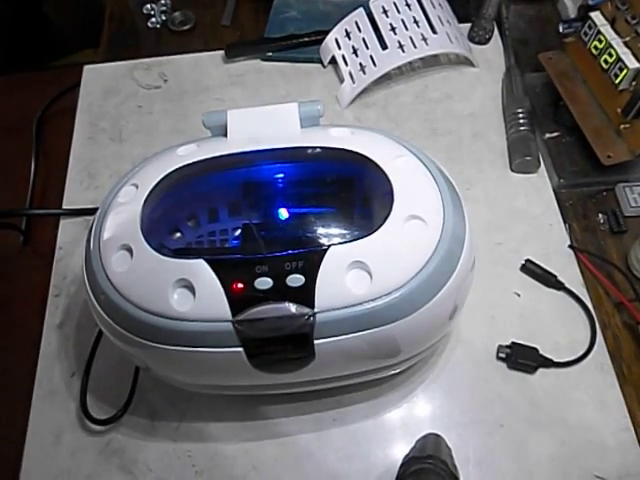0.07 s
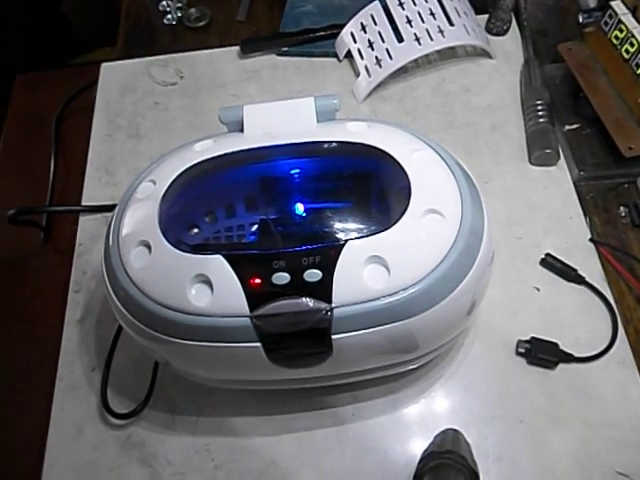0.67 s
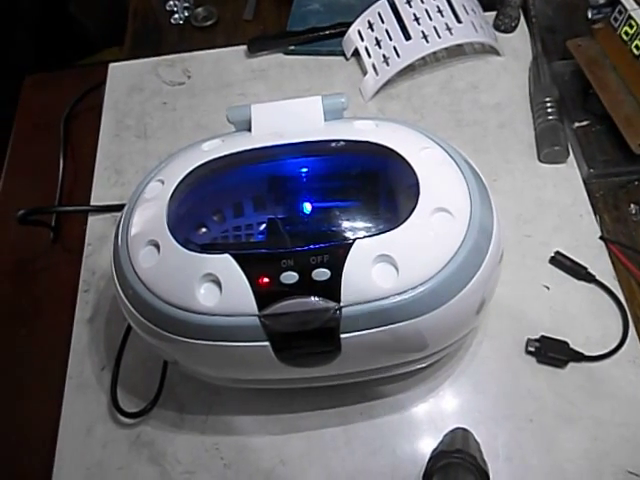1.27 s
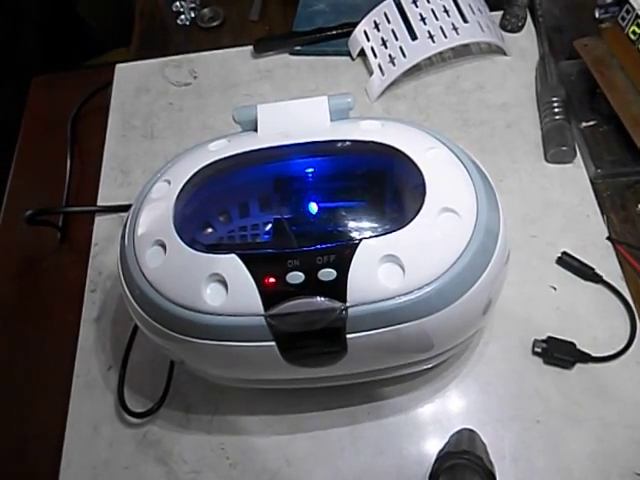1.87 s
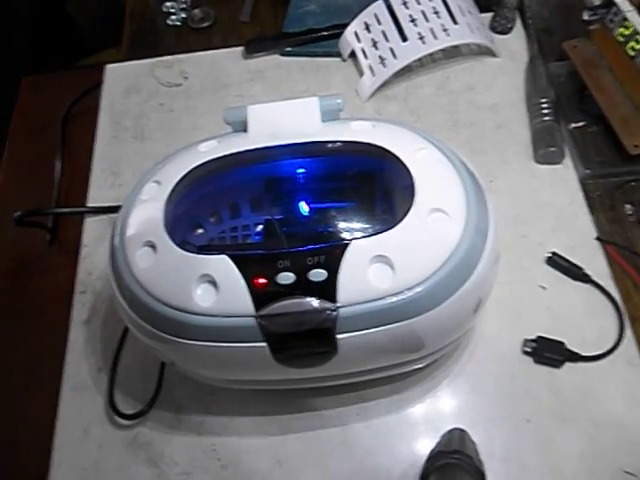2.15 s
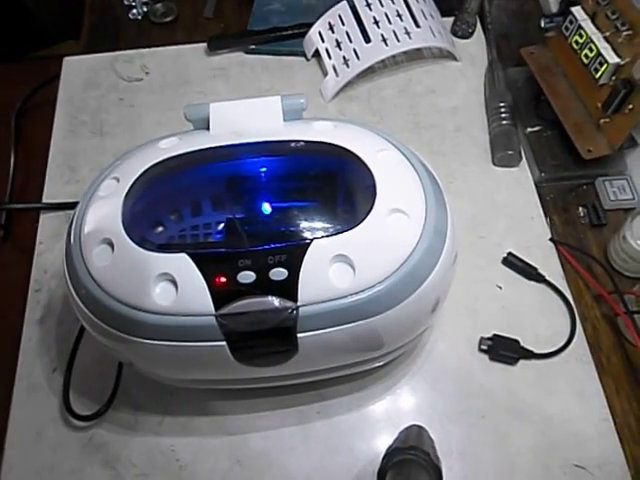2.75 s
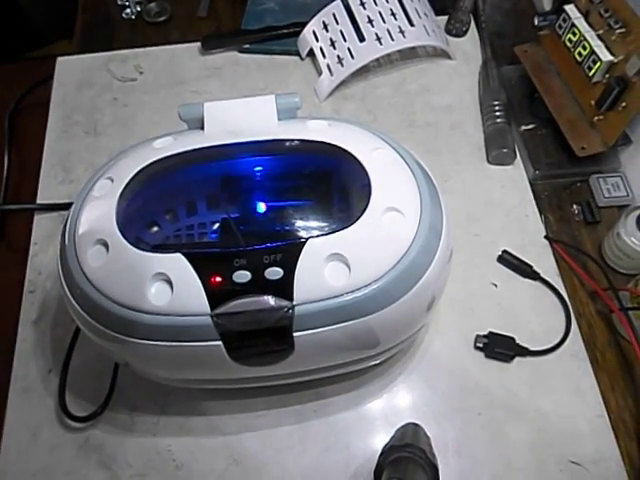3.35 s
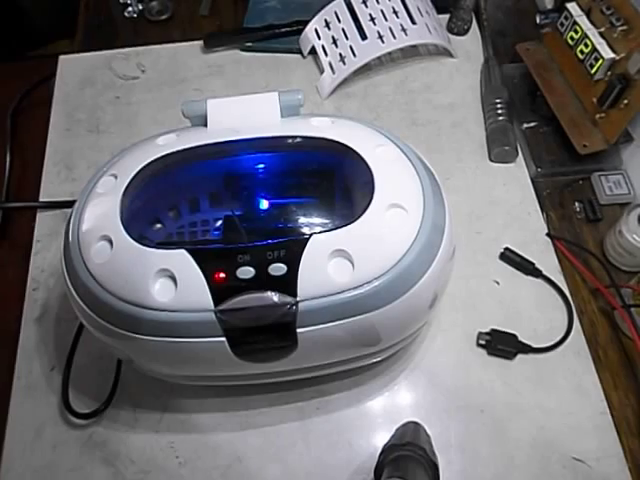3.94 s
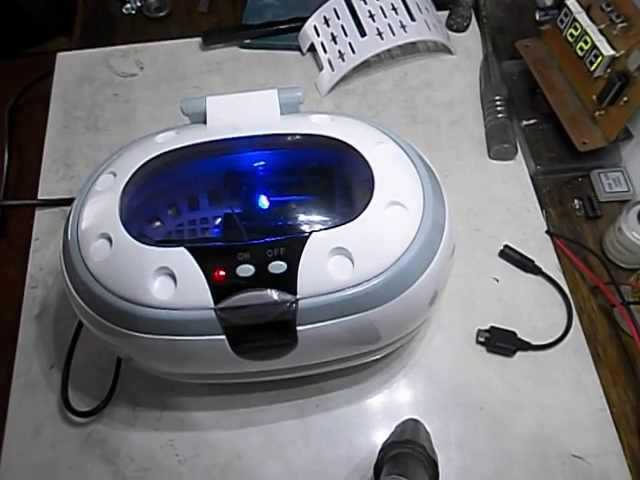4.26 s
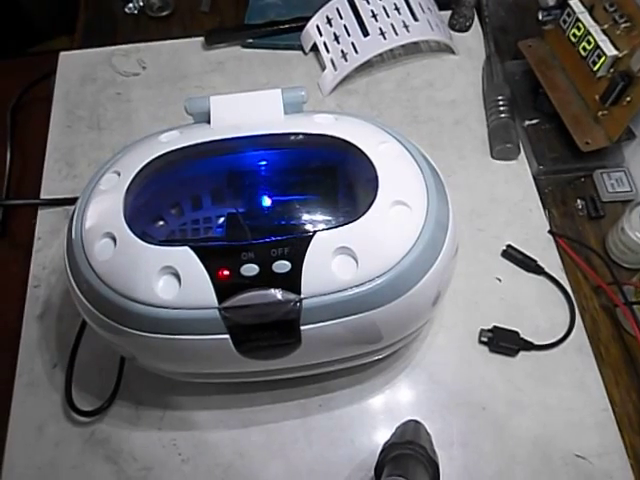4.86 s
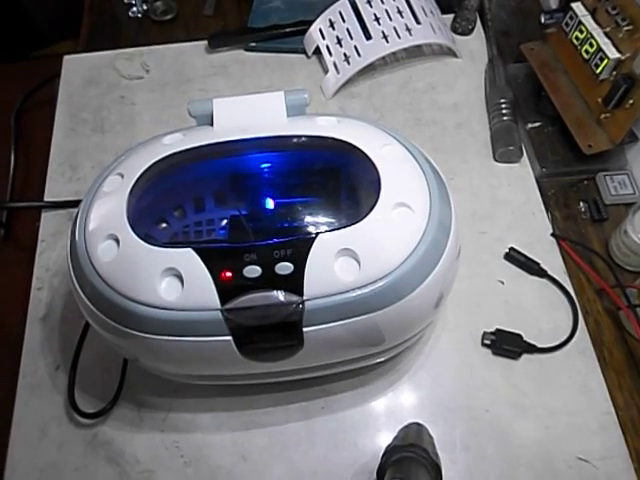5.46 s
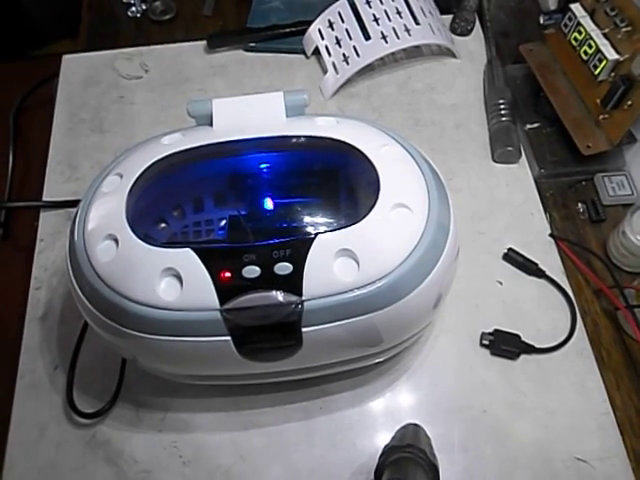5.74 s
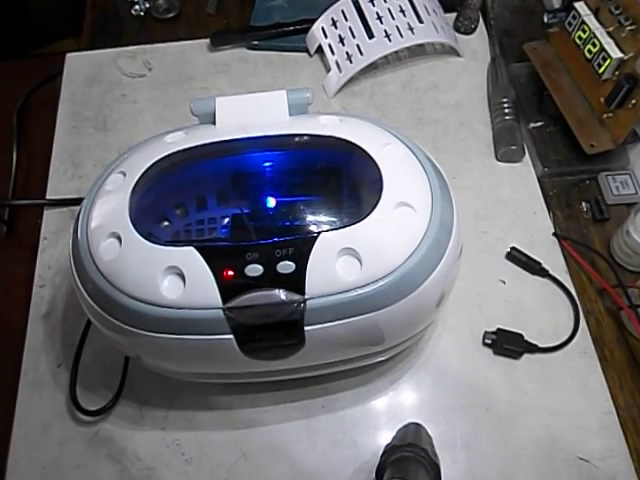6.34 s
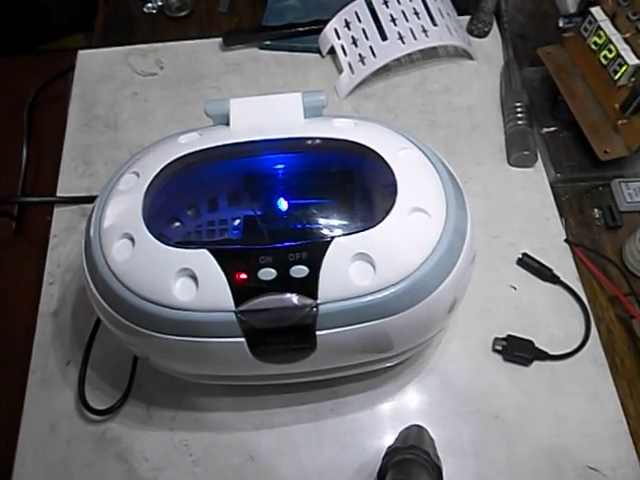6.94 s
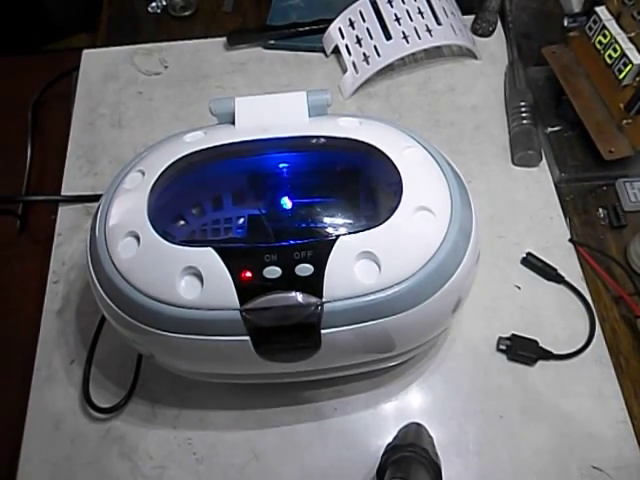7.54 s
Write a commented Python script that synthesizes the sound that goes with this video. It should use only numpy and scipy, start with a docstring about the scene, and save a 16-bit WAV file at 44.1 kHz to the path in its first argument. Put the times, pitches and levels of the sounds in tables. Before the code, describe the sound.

An even, whining buzz with a thin watery hiss comes from a small ultrasonic cleaner nearby in a quiet room. Light plastic ticks at first give way to a run of close, sharp knocks and scratchy rubs, ending in a loud double clack. A few gentle bumps follow as the buzzing carries on over a low hum.

```python
"""A small ultrasonic cleaner buzzes and fizzes: one burst of drive per mains cycle rings
its tank and collapses bubbles in the water. Plastic, handled close to the microphone,
knocks, clicks, rubs and creaks; the hardest knocks overload the recorder and duck its gain.
Behind it, a fan and the mains hum over faint room noise."""
import sys
import numpy as np
from scipy import signal
from scipy.fft import rfft, irfft, next_fast_len
from scipy.io import wavfile
from scipy.ndimage import uniform_filter1d, map_coordinates

SR = 44100
rng = np.random.default_rng(int(sys.argv[2]) if len(sys.argv) > 2 else 0)


def generate_wav(signal):
    """Clip the signal to [-1, 1] and save it as 16-bit WAV at the path in sys.argv[1]."""
    frames = np.transpose(np.atleast_2d(signal))
    scaled = np.clip(frames, -1, 1) * 32767
    pcm = np.round(scaled).astype(np.int16)
    wavfile.write(sys.argv[1], SR, pcm)


N = 335601
MAINS_HZ = 49.913


def amp(db):
    """Decibels to gain."""
    return 10 ** (np.asarray(db) / 20)


def unit_rms(x):
    """Scale to rms 1."""
    return x / np.sqrt(np.mean(x ** 2) + 1e-20)


def unit_peak(x):
    """Scale to peak 1."""
    return x / (np.abs(x).max() + 1e-20)


def curve(rows):
    """Interpolate (time_s, value) rows to one value per sample."""
    time_s, values = np.transpose(rows)
    return np.interp(np.arange(N) / SR, time_s, values)


def wobble(rate_hz):
    """Smooth random curve, rate_hz knots a second."""
    knots = rng.standard_normal(int(N * rate_hz / SR) + 4)
    return map_coordinates(knots, [np.arange(N) * rate_hz / SR], mode="nearest")


def filtered(x, response):
    """Apply a frequency response, given as a function of Hz."""
    size = next_fast_len(N + 8192)
    return irfft(rfft(x, size) * response(np.fft.rfftfreq(size, 1 / SR)), size)[..., :N]


def noise(spectrum):
    """Noise of rms 1, shaped by (freq_hz, relative_db) rows."""
    freq_hz, db = np.transpose(spectrum)
    white = rng.standard_normal(N)
    return unit_rms(filtered(white, lambda hz: amp(np.interp(np.log(hz + 1), np.log(freq_hz), db))))


def mains_cycles(peak_s=0.0139):
    """Mains phase in cycles; whole numbers at peak drive."""
    return (np.arange(N) / SR - peak_s) * MAINS_HZ


def tank_harmonics(hz, spread_cycles=0.1485, bass_spread_cycles=0.2827):
    """Complex harmonic gains: tank resonances set the size, random delays smear the bass most."""
    # tank and casing resonances: centre_hz, width_hz, peak_db
    resonances = [(404.5, 14.3, -43.5), (478, 246, -54), (720.6, 43, -47.5), (918, 38, -47),
                  (998, 20, -52.5), (1099, 45.4, -47.5), (1187, 69, -55.5), (1313, 47, -50.5),
                  (1497, 88, -56), (1802, 170, -57.5), (2065, 72, -48), (2340, 270, -54),
                  (2815, 102, -47.5), (2950, 120, -51), (3226, 65, -54.5), (3400, 71, -61),
                  (3666, 42.4, -41.5), (3932, 42, -50.5), (3980, 110, -64.5), (4565, 470, -57.8),
                  (5060, 290, -58.5), (5550, 290, -56), (6320, 770, -56.5), (7740, 830, -56)]
    power = sum(amp(db) ** 2 / (1 + 2 * ((hz - centre_hz) / width_hz) ** 2) ** 2
                for centre_hz, width_hz, db in resonances)
    scatter = unit_rms(uniform_filter1d(rng.standard_normal(len(hz)), size=2))
    delay_cycles = scatter * (spread_cycles + bass_spread_cycles * np.exp(-hz / 900))
    return np.sqrt(power) * np.exp(-2j * np.pi * np.cumsum(delay_cycles))


def tank_buzz(count=150, drift=0.37, wander_rad=1.6, flutter_db=1.0, swell_db=0.72):
    """Drive bursts ring the tank at mains harmonics; five bands swell independently."""
    # microphone drift between two spots: time_s, share_of_way
    mic_path = [(0, 0.3), (2.3, 0), (3.0, 1), (7.6, 0.63)]
    # standing waves at those spots: freq_hz, first_db, second_db
    standing_waves = [(400, -2, 1), (1100, 1, 1.8), (2050, 1.5, -1.5), (2700, -0.5, -0.5)]
    # body, middle, rasp, whine and treble bands: centre_hz, drift_share
    bands = [(1190, 0.58), (1900, 0.91), (2850, .8), (3680, 0.46), (4400, 1)]
    # rasp near 2.8 kHz: time_s, gain_db
    rasp_contour = [(0, -7), (1.35, 0), (2.7, .5), (5.4, -4.5), (6.2, 2.5), (7.6, -2.5)]
    # whine near 3.65 kHz, before centring and scaling: time_s, contour_db
    whine_contour = [(0.0, -48), (1.33, -50), (1.57, -49), (2.03, -51.5), (2.33, -49.5), (2.47, -56.5),
                     (2.73, -50), (2.92, -45), (3.13, -49), (3.68, -46.5), (4.4, -48), (4.53, -47),
                     (5.9, -49), (6.37, -53), (6.86, -48.5), (7.6, -51.5)]
    hz = (np.arange(count) + 1) * MAINS_HZ
    harmonics = tank_harmonics(hz)
    phase_cycles = mains_cycles() % 1

    def play(weights, size=8192):
        cycle = irfft(np.r_[0, weights], size) * size / np.sqrt(2)
        return np.interp(phase_cycles, np.arange(size + 1) / size, np.r_[cycle, cycle[0]])

    place = curve(mic_path)
    standing_hz, *spots_db = np.transpose(standing_waves)
    first, second = [amp(np.interp(hz, standing_hz, db)) for db in spots_db]
    whine_db = curve(whine_contour)
    gains_db = [0, 0, curve(rasp_contour), 0.5 + 1.4 * (whine_db - whine_db.mean()), 0]
    band_hz, drift_shares = np.transpose(bands)
    sways = [drift * wobble(rate_hz) for rate_hz in (1.2, 2.5, 6)]
    steady = hz < band_hz[-1]
    treble = harmonics * ~steady  # the top harmonics wander in phase
    angle_rad = wander_rad * wobble(14)
    out = np.cos(angle_rad) * play(treble) + np.sin(angle_rad) * play(1j * treble)
    for selector, gain_db, drift_share in zip(np.eye(len(bands)), gains_db, drift_shares):
        band = harmonics * np.interp(hz, band_hz, selector)
        tone = (1 - place) * play(band * steady * first) + place * play(band * steady * second)
        for sway in sways:  # moving water drifts each harmonic on its own
            tone += drift_share * sway * play(band * np.exp(2j * np.pi * rng.random(count)))
        out += amp(gain_db + swell_db * wobble(1.865) + flutter_db * wobble(30)) * tone
    return out


def cavitation_fizz(depth_db=6.5, lead_cycles=0.083, squareness=2.3, flicker_db=1.5):
    """Bubbles collapse while the drive is above their threshold."""
    # cavitation strength: time_s, level_db
    strength = [(0, -25), (.8, -21.5), (1.75, -21), (2.0, -23.5), (4.9, -23), (5.1, -25.5), (6.2, -20),
                (7.0, -19), (7.6, -18)]
    # bubble noise: freq_hz, relative_db
    spectrum = [(200, -42.5), (600, -8.5), (1500, -18), (2800, -12.5), (3750, -8.5), (4250, -25.5),
                (4700, -8), (5200, -13.5), (6100, 1), (6700, 0), (7300, 5)]
    drive = np.cos(2 * np.pi * (mains_cycles() + lead_cycles))
    gate = amp(depth_db * np.tanh(squareness * drive) + flicker_db * wobble(40))
    return amp(curve(strength)) * unit_rms(gate * noise(spectrum))


def ringing(modes, t, tilt_db=0, scatter_db=3.24, rise_s=0.00052):
    """Struck plastic modes: decaying sines of random phase and size, summed to peak 1."""
    hz, level_db, t60_s = np.transpose(modes)[:, :, None]
    waves = np.sin(2 * np.pi * (hz * t + rng.random(hz.shape)))
    sizes = amp(level_db + tilt_db + rng.normal(0, scatter_db, hz.shape) - 60 * t / t60_s)
    return unit_peak((sizes * waves).sum(0) * (1 - np.exp(-t / rise_s)))


def creak_slips(start_s=4.746, first_gap_s=0.013, gap_ratio=1.2, count=4,
                force_db=-26.5, favoured_hz=695, hardness_db=10):
    """Plastic slips at widening gaps; returns contact rows."""
    gaps_s = first_gap_s * gap_ratio ** np.arange(count - 1)
    return [(s, force_db, favoured_hz, hardness_db) for s in start_s + np.r_[0, np.cumsum(gaps_s)]]


def plastic_knocks(contact_db=2, ping_db=-20, crack_t60_s=0.0078, rattle_db=-26, rattle_t60_s=0.052,
                   thud_db=-23.5, thud_t60_s=0.16, spread_octaves=0.82):
    """Each contact cracks, rings the modes its spot favours and shakes the mount."""
    # contacts: start_s, force_db, favoured_hz, hardness_db (crack over ring)
    contacts = [(0.015, -18.5, 350, -1.5), (0.102, -18.5, 350, 4.5), (0.683, -24, 740, 7.5),
                (0.708, -30.5, 850, 14), (2.865, -18, 616, -6), (3.0825, -7, 850, 3),
                (3.1081, -7.5, 740, 15.5), (3.2661, -2.5, 930, 6.5), (3.534, -11, 630, 3.5),
                (3.606, -15, 630, 0), (3.632, -18, 630, 15), (3.721, -20.5, 630, 2), (3.877, -2.5, 1000, 7),
                (3.8852, -2.5, 1100, 5.5), (4.524, -15, 740, -2), (4.537, -15, 350, 2.5),
                (4.601, -27.5, 740, 17), (4.976, -2, 990, 5), (5.0069, -19, 850, 19),
                (5.0111, -4.5, 740, 9), (5.5114, 2, 1170, 2), (5.5145, 4.5, 1170, -14),
                (5.518, -5, 1170, 2.5), (5.5517, 1, 1170, 3.5), (5.558, -9, 1170, -7),
                (5.817, -14, 850, -2), (5.825, -17, 350, -8), (5.978, -23, 850, 1),
                (6.887, -22.5, 630, -22), (6.996, -19, 1170, 2), (7.02, -23, 560, -16),
                (7.12, -15.5, 740, -18), (7.374, -17, 560, 2)]
    # light ticks on a thin edge: start_s, level_db
    ticks = [(0.774, -23), (4.536, -9.5), (5.0052, -5), (5.518, -4), (5.5518, -2), (5.978, -17)]
    # plastic body modes: freq_hz, level_db, t60_s
    body_modes = [(272, -5, 0.11), (350, 1.5, 0.04), (560, 3.5, 0.026), (630, 2, 0.035), (740, -3.5, 0.029),
                  (850, -7.5, 0.066), (934, -3, 0.043), (1170, -2.5, 0.028), (1500, -8.5, 0.013)]
    # bright edge modes: freq_hz, level_db, t60_s
    edge_modes = [(3090, -3.5, 0.034), (3780, -0.5, 0.028), (4030, 3, 0.016)]
    # contact crack: freq_hz, relative_db
    crack_spectrum = [(300, -14.5), (1200, -6), (1650, -8.5), (2200, -0.5), (3000, -2.5), (3900, -2),
                      (4900, -10), (7300, -15.5)]
    # mount thud: freq_hz, relative_db
    thud_spectrum = [(20, -27), (60, -8.5), (110, -13.5), (220, -22), (400, -10.5), (1500, -74)]
    t = np.arange(SR // 5) / SR
    out = np.zeros(N + len(t))
    crack_noise = np.pad(noise(crack_spectrum), (0, len(t)))
    thud_noise = np.pad(noise(thud_spectrum), (0, len(t)))
    crack_decay = amp(-60 * t / crack_t60_s) + amp(rattle_db - 60 * t / rattle_t60_s)
    crack_envelope = crack_decay * (1 - np.exp(-t / 0.00066))
    thud_envelope = amp(-60 * t / thud_t60_s) * (1 - np.exp(-t / 0.00036))
    for start_s, force_db, favoured_hz, hardness_db in list(contacts) + creak_slips():
        span = slice(round(start_s * SR), round(start_s * SR) + len(t))
        octaves = np.abs(np.log2(np.array(body_modes)[:, :1] / favoured_hz))
        # the nearest mode stands out, more so under a light touch
        favour_db = (4 - 0.25 * force_db) * (octaves == octaves.min())
        ring = ringing(body_modes, t, favour_db - 4 * (octaves / spread_octaves) ** 2)
        crack = unit_peak(crack_noise[span] * crack_envelope) + amp(ping_db) * ringing(edge_modes, t)
        thud = unit_peak(thud_noise[span] * thud_envelope)
        out[span] += amp(contact_db + force_db) * (ring + amp(hardness_db) * crack)
        out[span] += amp(thud_db + 0.3 * (force_db - hardness_db)) * thud
    for start_s, level_db in ticks:
        out[round(start_s * SR):][:len(t)] += amp(level_db) * ringing(edge_modes, t)
    return out[:N]


def plastic_rubbing(edge_s=0.013, grain_db=1.5, groan_db=-38.5, groan_fade_db_per_s=2.5):
    """Plastic slides in uneven slips: dull rub, bright scratch, groan of its hollow resonance."""
    # strokes: start_s, end_s, pressure_db, grit_db (scratch over rub)
    strokes = [(2.818, 3.075, -45.5, 2.5), (3.112, 3.2, -43, 3), (3.285, 3.4, -40.5, 3.5),
               (3.57, 3.64, -35.5, -14), (3.895, 4.178, -33, 0.5), (4.178, 4.271, -30.5, 3),
               (4.278, 4.331, -33, -13), (4.43, 4.463, -32.5, -12), (4.526, 4.628, -34.5, 2.5),
               (4.72, 4.797, -33.5, -6), (5.01, 5.085, -36.5, 3), (5.199, 5.347, -36.5, 2.5),
               (6.872, 7.062, -37, -22), (7.142, 7.171, -38, -13)]
    # dull rub: freq_hz, relative_db
    rub_spectrum = [(40, -13), (110, 3), (200, -18.5), (310, 0), (480, -4.5), (620, -4), (900, -0.5),
                    (1250, -9), (1600, -14.5), (2200, -32.5), (7000, -47)]
    # bright scratch: freq_hz, relative_db
    scratch_spectrum = [(300, -35.5), (1000, -14), (1600, -1.5), (2400, 6), (3900, 8.5), (4800, 0),
                        (7000, -4.5)]
    # hollow resonance: freq_hz, relative_db
    groan_spectrum = [(300, -23), (500, -11.5), (570, -2.5), (640, -6.5), (720, -8), (1100, -35.5),
                      (3000, -77.5)]
    t = np.arange(N) / SR
    rub, scratch, groan = np.zeros((3, N))
    for start_s, end_s, pressure_db, grit_db in strokes:
        sliding = (np.tanh((t - start_s) / edge_s) - np.tanh((t - end_s) / edge_s)) / 2
        rub += amp(pressure_db) * sliding
        scratch += amp(pressure_db + grit_db) * sliding
        groan += amp(groan_db - groan_fade_db_per_s * (start_s - strokes[0][0])) * sliding
    slips = unit_rms(amp(grain_db * wobble(170)))
    return slips * (rub * noise(rub_spectrum) + scratch * noise(scratch_spectrum)
                    + groan * noise(groan_spectrum))


def room_hum(air_db=-50, waver_db=0.8, waver_rad=0.074):
    """Slightly unsteady mains and fan tones over a faint rush of air."""
    # mains and fan tones: pitch_hz, level_db
    tones = [(99.8, -59), (120, -42.5), (144, -56.5), (255, -56.5)]
    # room air: freq_hz, relative_db
    air_spectrum = [(15, -10.5), (30, 6.5), (70, -3), (120, -1.5), (200, -4), (400, -2), (800, -19.5),
                    (1600, -19), (4000, -7.5), (7500, -45.5)]
    t = np.arange(N) / SR
    hum = sum(amp(db + waver_db * wobble(12)) * np.sin(2 * np.pi * hz * t + waver_rad * wobble(7.2))
              for hz, db in tones)
    return np.sqrt(2) * hum + amp(air_db) * noise(air_spectrum)


def scene():
    """All sources at one microphone, alike in both channels."""
    mono = tank_buzz() + cavitation_fizz() + room_hum() + plastic_knocks() + plastic_rubbing()
    return np.array([mono, mono])


def gain_control(x, threshold=0.26, duck_db=8, load_s=0.0037, attack_s=0.0033, release_s=0.067):
    """Time over the threshold pulls the gain down; it then creeps back."""
    over_s = (np.abs(x[0]) > threshold) / SR
    t = np.arange(SR) / SR
    memory = np.exp(-t / release_s) * (1 - np.exp(-(t / attack_s) ** 2))
    load = signal.fftconvolve(over_s, memory)[:N] / load_s
    return x * amp(-duck_db * np.tanh(load / 2))


def record(dry):
    """Narrow-band recorder: gain control, clipping near full scale, left channel slightly late."""
    mic_hz, top_hz = 7430, 16000
    lag_s = np.array([[31e-6], [-31e-6]])
    narrow = filtered(dry, lambda hz: 1 / np.sqrt(1 + (hz / mic_hz) ** 56))
    clipped = np.clip(gain_control(narrow), -0.97, 0.97)
    return filtered(clipped,
                    lambda hz: np.exp(-2j * np.pi * hz * lag_s) / np.sqrt(1 + (hz / top_hz) ** 80))


dry = scene()
out = record(dry)
generate_wav(out)
```